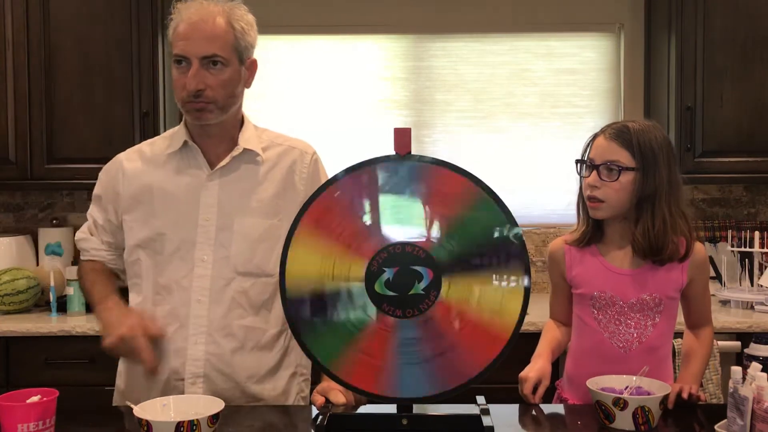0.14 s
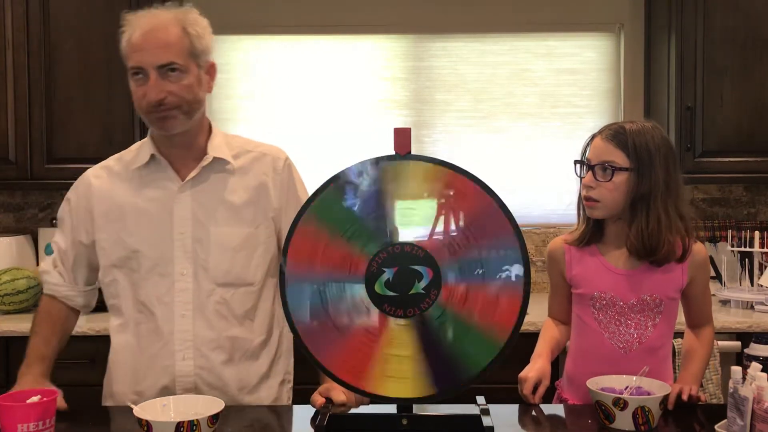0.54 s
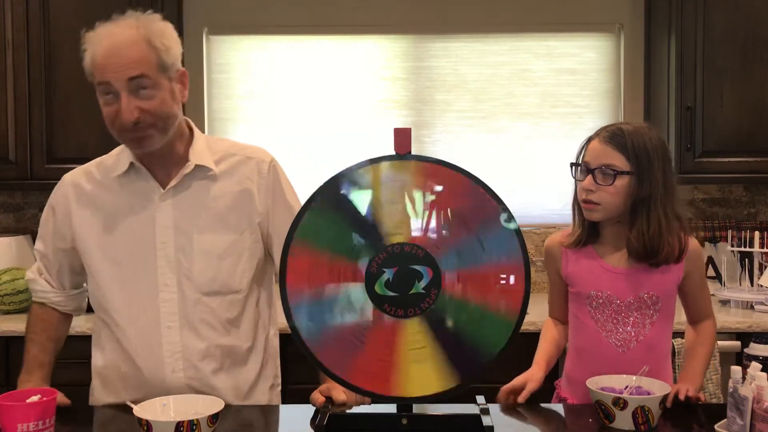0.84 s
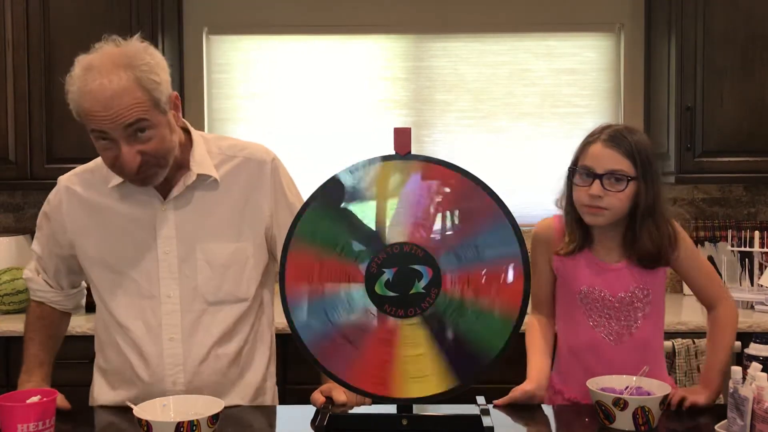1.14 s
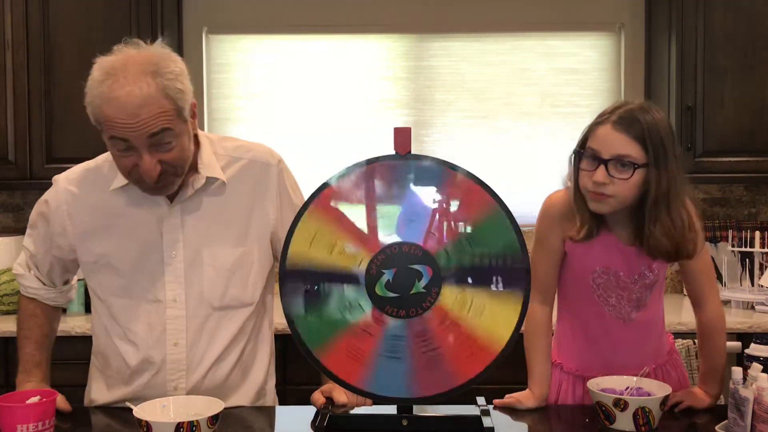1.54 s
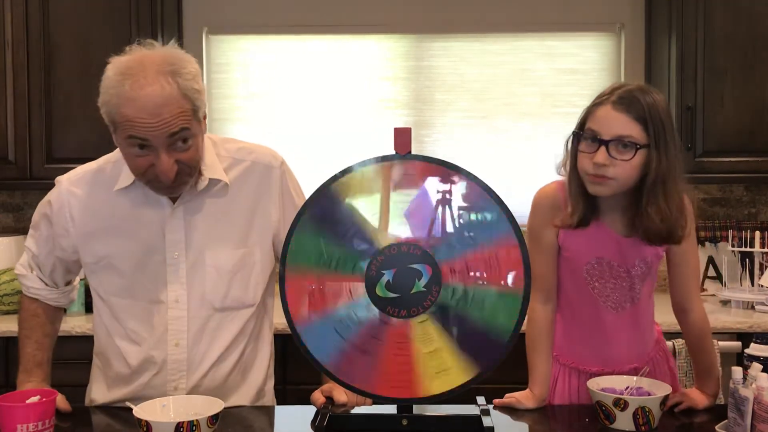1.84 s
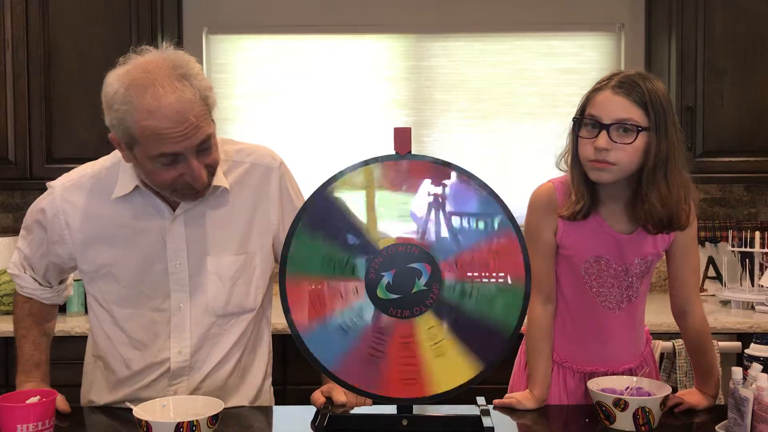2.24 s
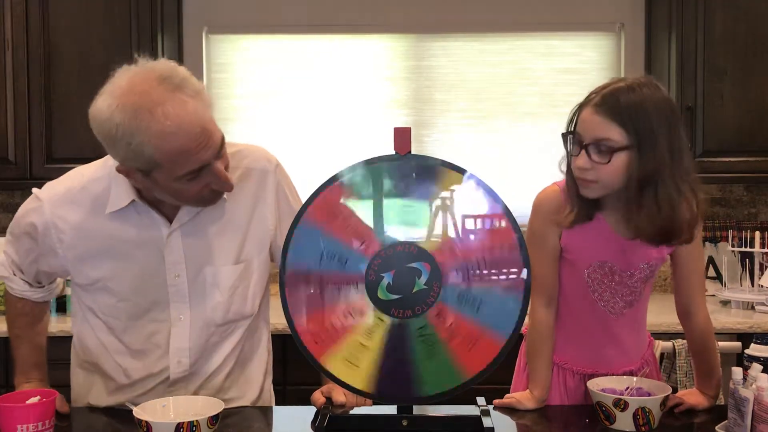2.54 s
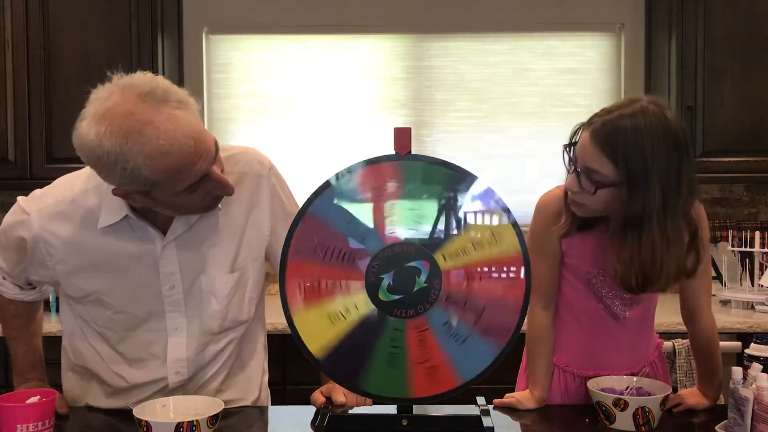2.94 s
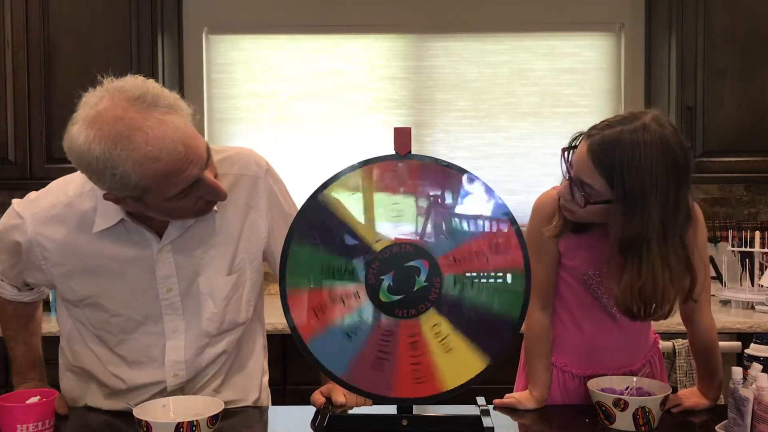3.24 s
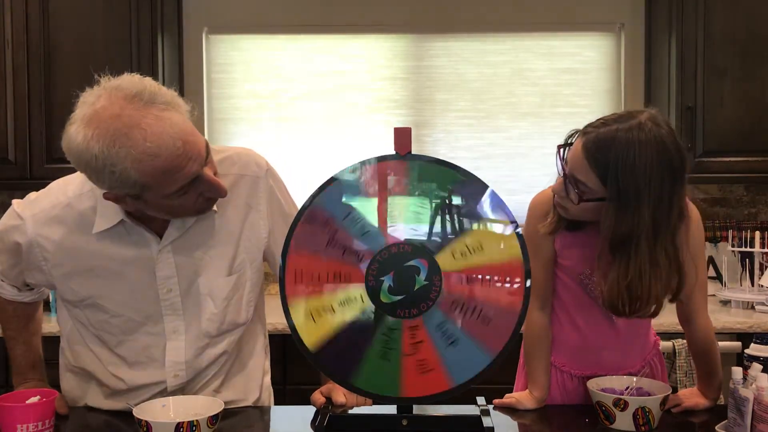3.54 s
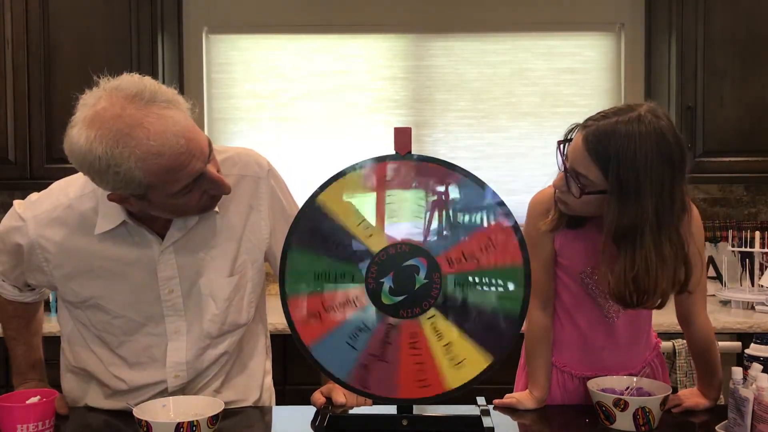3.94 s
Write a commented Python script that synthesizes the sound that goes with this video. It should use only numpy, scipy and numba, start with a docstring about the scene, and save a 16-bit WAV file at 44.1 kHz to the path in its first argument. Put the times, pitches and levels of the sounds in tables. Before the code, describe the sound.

A prize wheel coasts down in a hard-walled kitchen, its plastic flapper clattering over pegs from a rapid rattle to separate slowing clacks.

```python
"""A tabletop prize wheel coasts down in a hard-walled kitchen, a couple of metres from a phone.
A plastic flapper snaps off each peg: noise grains chatter, modes of disc and flapper ring, the stand thumps.
Something on the wheel knocks once a turn for four turns; discrete bounces and a noise tail smear the ticks.
Low house noise runs underneath, and the phone's gain control flattens the peaks."""
import sys
import numpy as np
from scipy import signal
from scipy.fft import rfft, irfft
from scipy.io import wavfile
from numba import njit

SR = 44100
rng = np.random.default_rng(int(sys.argv[2]) if len(sys.argv) > 2 else 0)


def gain_from_db(level_db):
    """Convert decibel levels to linear amplitude factors (20 dB per decade)."""
    decades = np.asarray(level_db, float) / 20
    return 10 ** decades


def log_audio(samples):
    """Write samples as a 16-bit WAV file to the path given in sys.argv[1]."""
    # one column per channel
    frames = np.atleast_2d(samples).T
    # limit to full scale, then quantise
    limited = np.clip(frames, -1, 1)
    pcm = np.round(limited * 32767).astype(np.int16)
    wavfile.write(sys.argv[1], SR, pcm)


N = 180610
LEAD_S = 0.4  # room for pegs that pass before the start
PEGS, EARLY_PEGS, TURNS = 14, 10, 6
FIRST_PEG_S = 0.0


def unit(x):
    """Scale to unit energy."""
    return x / np.sqrt(np.sum(x ** 2))


def colour(x, points):
    """Minimum-phase filter through (Hz, dB) points on a log-frequency axis: nothing rings ahead of the blow."""
    hz, db = np.transpose(points)
    f = np.fft.rfftfreq(len(x), 1 / SR) + 1
    log_gain = np.log(gain_from_db(np.interp(np.log(f), np.log(hz), db)))
    cepstrum = irfft(log_gain, len(x))
    # fold to the causal side
    cepstrum[1:len(x) // 2] *= 2
    cepstrum[len(x) // 2 + 1:] = 0
    return irfft(rfft(x) * np.exp(rfft(cepstrum)), len(x))


def place(times_s, sounds, gains):
    """Lay sounds on a line that starts LEAD_S early."""
    out = np.zeros(N + SR)
    for s, sound, gain in zip(times_s, sounds, gains):
        at = int((s + LEAD_S) * SR)
        out[at:at + len(sound)] += gain * sound
    return out


def coast(pegs):
    """Time and speed at given angles: friction and drag eat the energy, the heavy side swings it."""
    start_pegs_s, friction_pegs_s2, drag_per_peg = 29.258, 4.8993, 0.00084395
    # off balance: speed gained by the fall of the heavy side alone, peg at which it is lowest
    swing_pegs_s, lowest_peg = 3.6276, 4.3302
    step_pegs = 0.01
    angle = np.arange(-EARLY_PEGS, TURNS * PEGS, step_pegs)
    stall = friction_pegs_s2 / drag_per_peg
    squared = (start_pegs_s ** 2 + stall) * np.exp(-2 * drag_per_peg * angle) - stall
    swing = swing_pegs_s ** 2 * np.cos(2 * np.pi * (angle - lowest_peg) / PEGS)
    speed = np.sqrt(np.maximum(squared + swing, 1))
    s = np.cumsum(step_pegs / speed)
    times_s = np.interp(pegs, angle, s) - np.interp(0, angle, s) + FIRST_PEG_S
    return times_s, np.interp(pegs, angle, speed)


# flapper against wheel speed: speed_pegs_s, snap_db, and relative to the snap: thump_db, ring_db, bright_db
FLAPPER_BY_SPEED = [(9.03, -10.5, 12.5, -6, 0.5), (14.04, -10.5, 12.5, -6.5, 3),
                    (18.92, -10.5, 12.6, -5.5, 3.5), (24.3, -10.5, 14.5, -5, 3.6),
                    (29.7, -11, 13.5, -6, 3.6)]
# offset of each peg round the ring: snap_db, thump_db
PEG_OFFSETS = [(-2.9, .4), (-2.5, -0.4), (-3.2, -1.3), (-2.8, 0.3), (-2.3, -0.2), (-2.7, 1.8), (-3.3, 1.8),
               (-2.5, 1.8), (-2.95, 1), (-2.2, 1.5), (-3.2, 1), (-2.7, 0.5), (-2.3, -1.5), (-2.4, 0.6)]
# standard deviation from tick to tick: snap_db, thump_db, ring_db, bright_db
TICK_SCATTER = (0.13, 1.1, 0.76, 0.49)


def ticks():
    """Time, snap, thump, ring and brightness of each peg: speed sets the blow, peg and chance vary it."""
    peg = np.arange(-EARLY_PEGS, TURNS * PEGS)
    times_s, speed = coast(peg)
    law = np.array(FLAPPER_BY_SPEED).T
    db = np.array([np.interp(speed, law[0], column) for column in law[1:]]).T
    db += np.array(TICK_SCATTER) * rng.standard_normal(db.shape)
    db[:, :2] += np.array(PEG_OFFSETS)[peg % PEGS]
    return np.c_[times_s, db][times_s < N / SR].T


def chatter(count, rise_s, rattle_s, grit):
    """The flapper slaps the peg and rattles on in uneven grains, differently each time."""
    t = np.arange(int(.05 * SR)) / SR
    sign, size = rng.standard_normal((count, 2, len(t))).transpose(1, 0, 2)
    grains = sign * np.exp(grit * size)
    bursts = grains * np.exp(-t / rattle_s) * (1 - np.exp(-t / rise_s))
    return bursts / np.linalg.norm(bursts, axis=1, keepdims=True)


def rings(modes, count, scatter_db):
    """Decaying modes, one set per blow: levels scatter, neighbours start in opposite phase."""
    hz, t60_s, db = np.transpose(modes)[:, :, None]
    t = np.arange(int(.2 * SR)) / SR
    shapes = np.sin(2 * np.pi * hz * t) * 1000. ** (-t / t60_s) / np.sqrt(t60_s * SR)
    sign = (-1.) ** np.arange(len(modes))
    levels_db = db[:, 0] + scatter_db * rng.standard_normal((count, len(modes)))
    return (gain_from_db(levels_db) * sign) @ shapes


# modes of disc and flapper: pitch_hz, t60_s, level_db (relative)
DISC_MODES = [(1140, .03, -19), (1850, .035, -9), (2030, .045, -8), (2300, .03, -14), (3090, .06, -7),
              (3245, .08, -5), (3395, .1, -1), (3520, .04, -10), (3690, .08, -5), (3925, .14, 2.5),
              (4200, .08, -1), (4290, .07, -3), (4520, .07, -2), (4680, .04, -5), (5210, .05, -7),
              (5465, .05, -9), (6495, .04, -13), (7245, .04, -12), (8320, .03, -10), (12505, .03, -12)]
# filter for the bare snap: freq_hz, gain_db
SNAP_COLOUR = [(200, -19), (450, -14), (800, -14), (1500, -6.5), (2700, -2), (3300, 7.5), (4500, 9),
               (5500, 3), (7000, 1), (10000, 2), (10600, -3), (12500, 3), (14500, 1), (15900, 3)]


def clacks(ring_db, bright_db, rattle_s):
    """The rattle heard bare, over the modes of the disc that swell while the flapper slaps."""
    body = rings(DISC_MODES, count=len(ring_db), scatter_db=1.0)
    swell_s = 0.00026
    body = body * (1 - np.exp(-np.arange(body.shape[1]) / (swell_s * SR)))
    bursts = chatter(count=len(ring_db), rise_s=0.00065, rattle_s=rattle_s, grit=0.66)
    low = signal.lfilter([.6], [1, -.4], bursts)
    bare = low + gain_from_db(bright_db)[:, None] * (bursts - low)
    out = gain_from_db(ring_db + 27.5)[:, None] * body
    out[:, :bare.shape[1]] += gain_from_db(16.5) * np.array([colour(b, SNAP_COLOUR) for b in bare])
    return out


# reflection tail by band: centre_hz, early_t60_s, late_t60_s, late_share_db
KITCHEN_BANDS = [(125, 0.6, 0.73, -31), (348, 0.58, 0.46, -10), (660, 0.098, 1, -7.5),
                 (2090, 0.2, 0.49, -3.5), (3430, 0.033, 1, -7.5), (8200, 0.045, 0.84, -7),
                 (12200, 0.028, 0.88, -10), (15700, 0.074, 0.3, -9)]


def kitchen():
    """Dense reflections: noise that builds up fast and dies in two slopes per band."""
    t = np.arange(int(.5 * SR)) / SR
    centres = np.log(np.array(KITCHEN_BANDS)[:, 0])
    f = np.log(np.fft.rfftfreq(len(t), 1 / SR) + 1)
    noise = rfft(rng.standard_normal(len(t)))
    tail = 0
    for share, (_, early_s, late_s, late_db) in zip(np.eye(len(centres)), KITCHEN_BANDS):
        band = irfft(noise * np.interp(f, centres, share), len(t))
        tail = tail + band * (1000. ** (-t / early_s) + gain_from_db(late_db) * 1000. ** (-t / late_s))
    build_s = 0.0029
    return unit(tail * (1 - np.exp(-t / build_s)))


def reverberate(x):
    """Convolve with one fresh kitchen tail."""
    return signal.fftconvolve(x, kitchen())[:N + SR]


def scattered(times_s, slaps, gains):
    """The turning disc throws each clack at the walls in another direction: random mix of five tails."""
    aim = rng.standard_normal((len(times_s), 5)) + [1.0, 0, 0, 0, 0]
    aim /= np.linalg.norm(aim, axis=1, keepdims=True)
    return sum(reverberate(place(times_s, slaps, gains * a)) for a in aim.T)


# direct sound, then first bounces off counter, window and cupboards: delay_s, level_db
FIRST_BOUNCES = [(0, -2), (.004, -10), (.008, -10.5), (0.0146, -6.5), (0.018, -18), (0.027, -10.5)]


def bounced(times_s, sounds, gains):
    """Direct sound plus discrete delayed copies."""
    return sum(gain_from_db(db) * place(times_s + delay_s, sounds, gains) for delay_s, db in FIRST_BOUNCES)


# modes of the stand on the counter: pitch_hz, t60_s, level_db (relative)
STAND_MODES = [(67, 0.23, -6), (129.3, 0.38, -20.5), (136, 0.15, -13), (173.8, 0.35, -4), (251, 0.14, -4),
               (290.6, 0.59, -2.5), (320.2, 0.091, 5.5), (350.7, 0.15, 4), (648, 0.17, -12.5),
               (934, 0.14, -9.5)]


def thumps(times_s, level_db):
    """Each blow rings the stand's low modes, dry and through the kitchen."""
    dry_thumps = place(times_s, rings(STAND_MODES, count=len(times_s), scatter_db=1.27), gain_from_db(level_db))
    return dry_thumps + gain_from_db(-8) * reverberate(dry_thumps)


# knock on each successive turn: level_db
KNOCK_LEVELS = [-6.5, -8.5, -11, -25]


def knocks():
    """Time, level, ring and brightness of a knock at one fixed angle of the ring, once a turn."""
    knock_peg, ring_db, bright_db = 4.7, -10.0, -26.0
    count = len(KNOCK_LEVELS)
    times_s = coast(knock_peg + PEGS * np.arange(count))[0]
    return times_s, KNOCK_LEVELS, np.full(count, ring_db), np.full(count, bright_db)


def wheel():
    """All ticks and knocks through the kitchen, with pegs that passed just before still echoing."""
    tick_s, snap_db, thump_db, tick_ring_db, tick_bright_db = ticks()
    knock_s, knock_db, knock_ring_db, knock_bright_db = knocks()
    times_s, gains = np.r_[tick_s, knock_s], gain_from_db(np.r_[snap_db, knock_db])
    tick_sounds = clacks(tick_ring_db, tick_bright_db, rattle_s=0.015)
    knock_sounds = clacks(knock_ring_db, knock_bright_db, rattle_s=0.0054)
    # the kitchen tail is fed one short slap per blow, without the rattle
    room_ring_db = np.r_[tick_ring_db, knock_ring_db] - 0.5
    slaps = clacks(room_ring_db, np.r_[tick_bright_db, knock_bright_db], rattle_s=.1 / SR)
    out = scattered(times_s, slaps, gains)
    out += bounced(times_s, np.vstack([tick_sounds, knock_sounds]), gains)
    out += thumps(tick_s, snap_db + thump_db)
    return out[int(LEAD_S * SR):][:N]


# filter for the house noise: freq_hz, gain_db (relative)
HUM_COLOUR = [(25, -33), (45, -3), (70, -12.5), (125, 3.5), (180, -4), (300, -14), (700, -18),
              (2000, -13.5), (8000, -60)]


def hum():
    """Low steady house noise: filtered white noise."""
    rms_db = -45
    x = colour(rng.standard_normal(N), HUM_COLOUR)
    return gain_from_db(rms_db) * unit(x) * np.sqrt(N)


def scene():
    """The wheel in the kitchen, over the hum."""
    return (wheel() + hum())[None]


@njit
def squeeze(x, top, slope, attack_s, release_s):
    """Gain control: a follower tracks the level and gain falls where it exceeds top."""
    attack, release = 1 / (attack_s * SR), 1 / (release_s * SR)
    y, level = np.empty(len(x)), 1e-9
    for i in range(len(x)):
        level += (abs(x[i]) - level) * (attack if abs(x[i]) > level else release)
        y[i] = x[i] * min(1., top / level) ** slope
    return y


def low_pass(x):
    """Removes everything above the highest recorded frequency."""
    return signal.sosfilt(signal.butter(12, 15760, fs=SR, output="sos"), x)


def record(dry):
    """The microphone drops deep bass; the phone holds the level down, rounds sharp peaks and cuts the top."""
    bass_cut = signal.butter(N=2, Wn=100, btype="high", fs=SR, output="sos")
    thin = signal.sosfilt(bass_cut, dry[0])
    held = squeeze(thin, gain_from_db(-22.0), 0.84, attack_s=0.0081, release_s=0.0073)
    ceiling = 0.5
    rounded = ceiling * np.tanh(held[None] / ceiling)
    top_cut = signal.ellip(N=12, rp=.2, rs=60, Wn=15720, fs=SR, output="sos")
    return low_pass(signal.sosfilt(top_cut, rounded))


dry = scene()
out = record(dry)
log_audio(out)
```